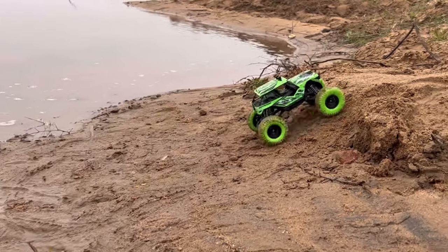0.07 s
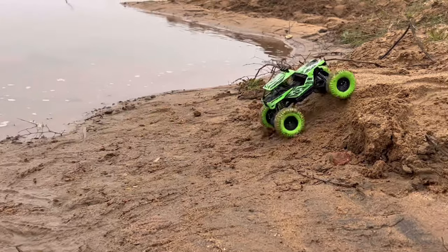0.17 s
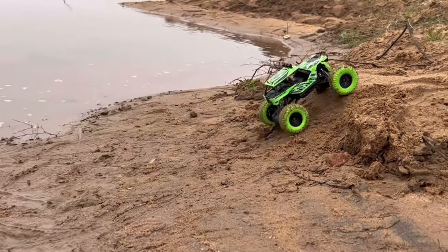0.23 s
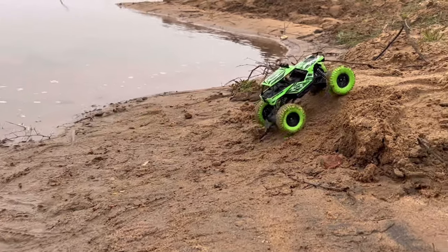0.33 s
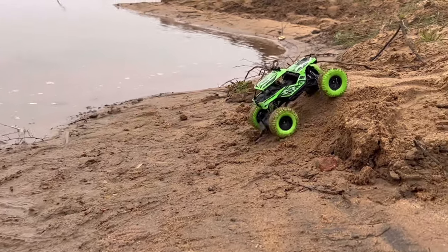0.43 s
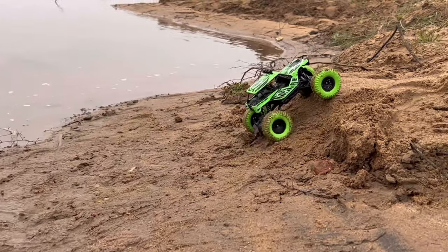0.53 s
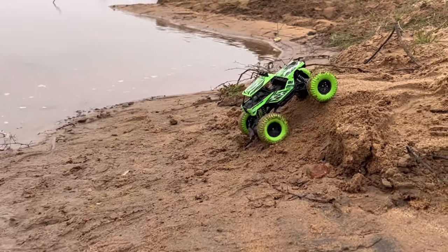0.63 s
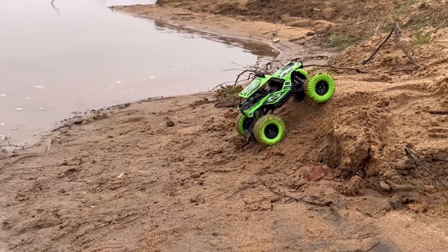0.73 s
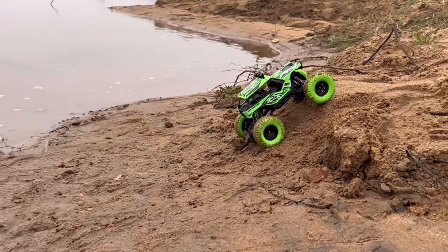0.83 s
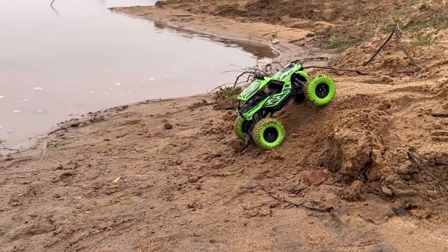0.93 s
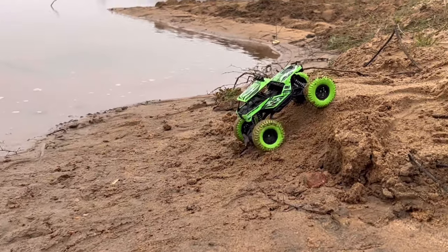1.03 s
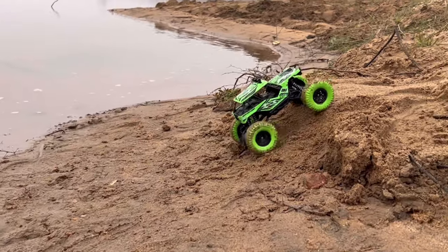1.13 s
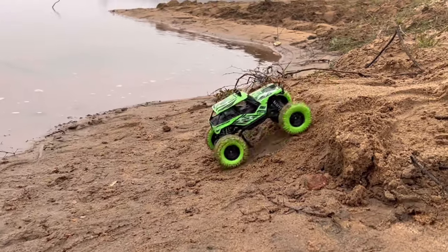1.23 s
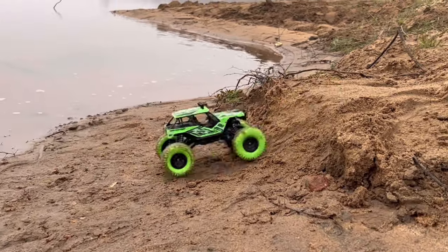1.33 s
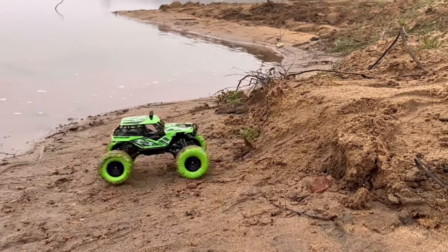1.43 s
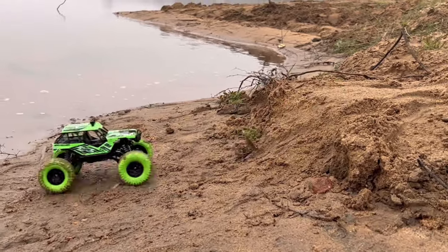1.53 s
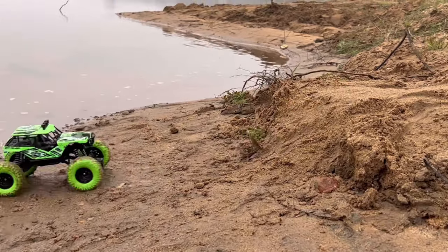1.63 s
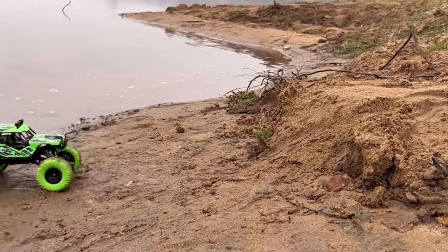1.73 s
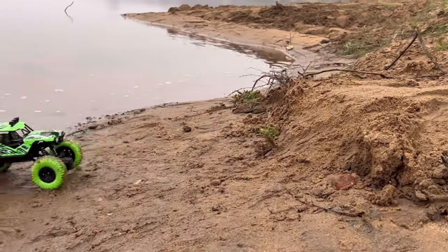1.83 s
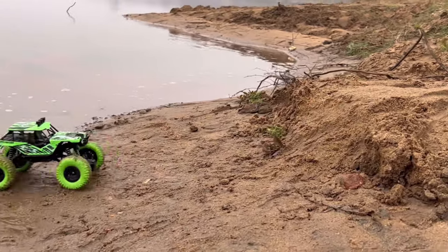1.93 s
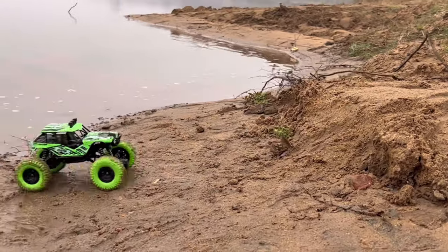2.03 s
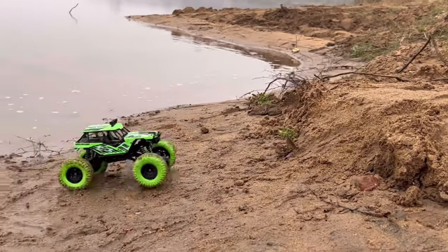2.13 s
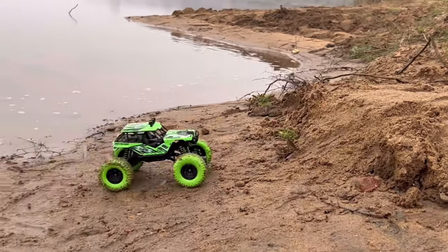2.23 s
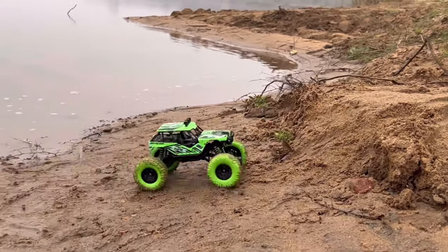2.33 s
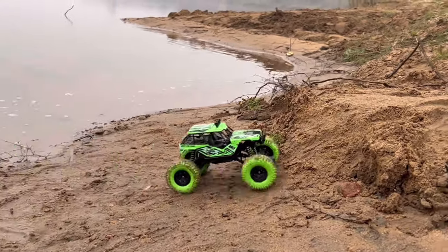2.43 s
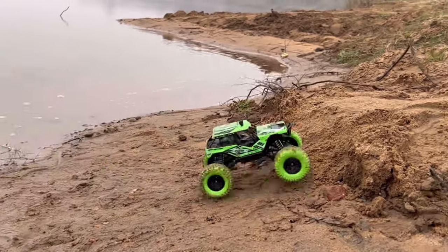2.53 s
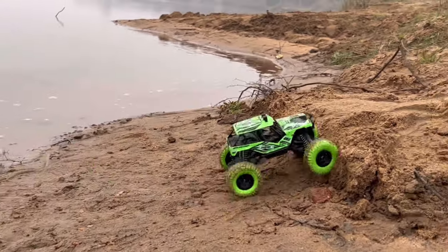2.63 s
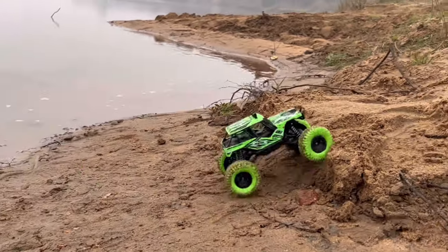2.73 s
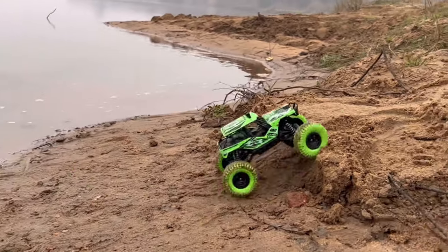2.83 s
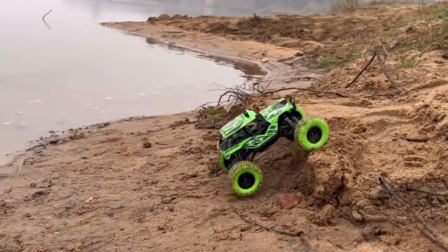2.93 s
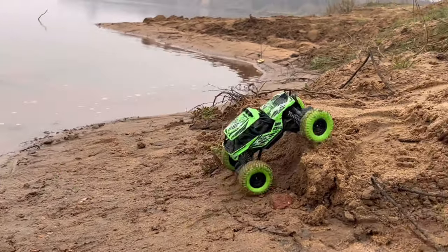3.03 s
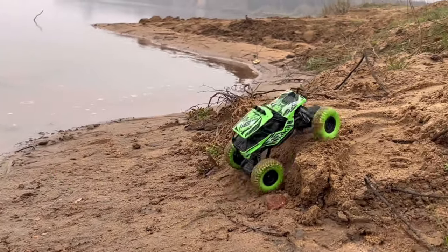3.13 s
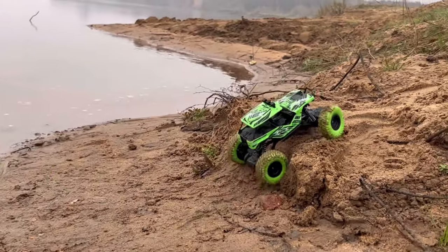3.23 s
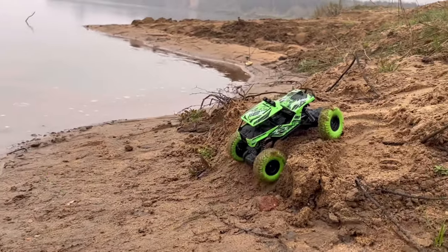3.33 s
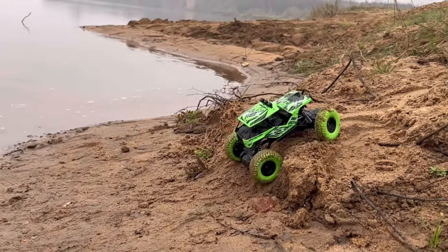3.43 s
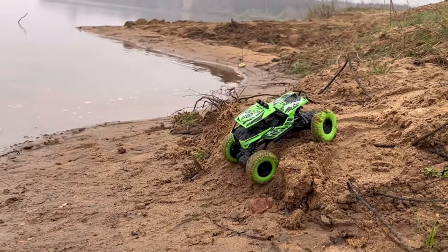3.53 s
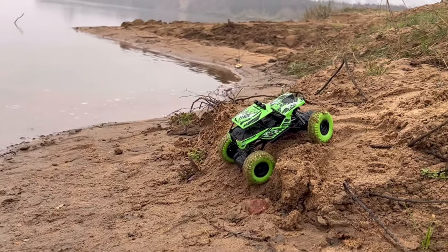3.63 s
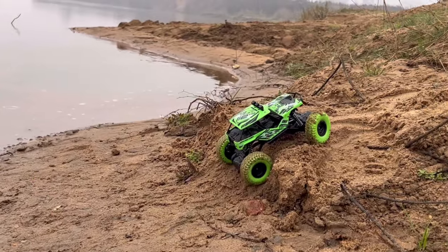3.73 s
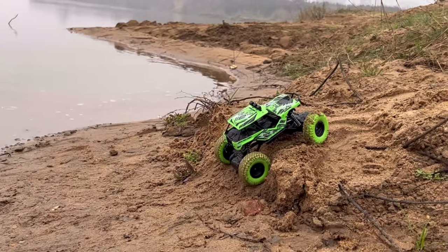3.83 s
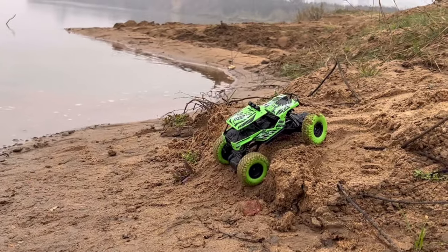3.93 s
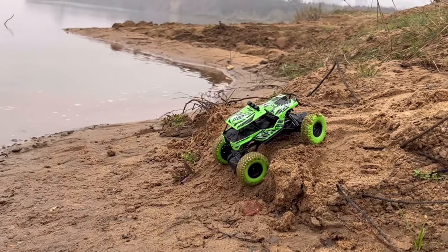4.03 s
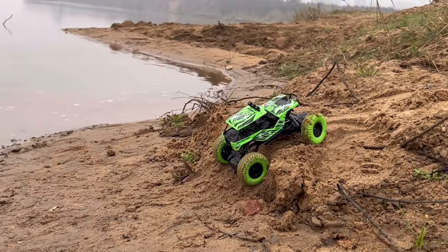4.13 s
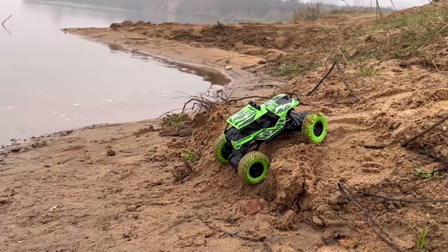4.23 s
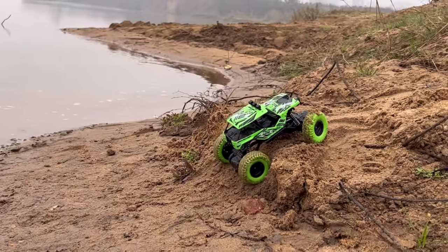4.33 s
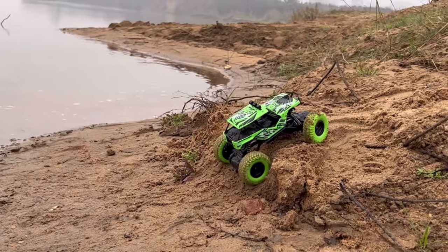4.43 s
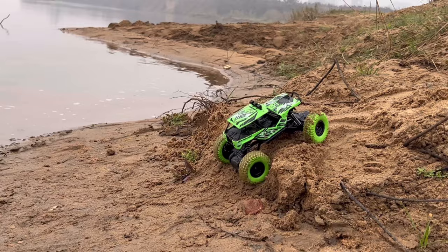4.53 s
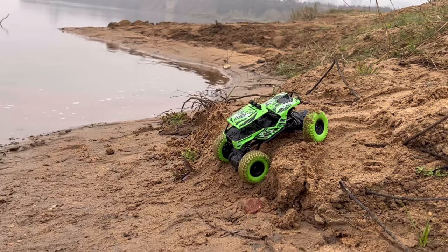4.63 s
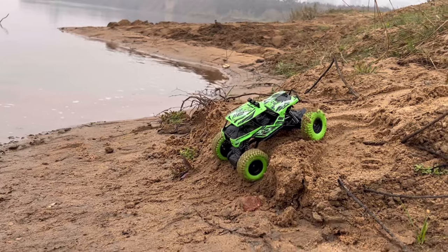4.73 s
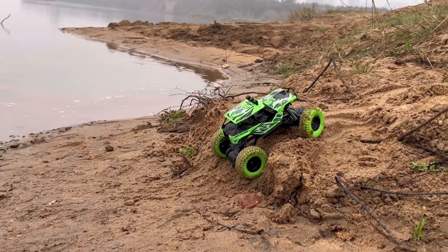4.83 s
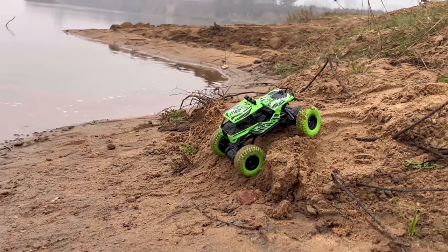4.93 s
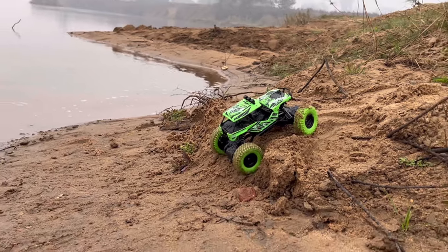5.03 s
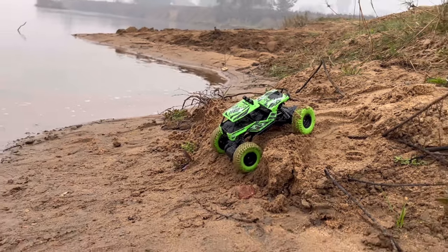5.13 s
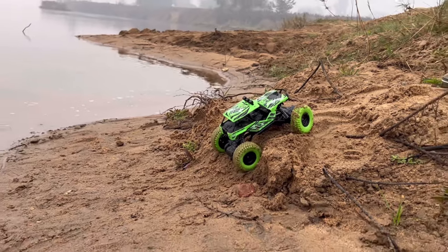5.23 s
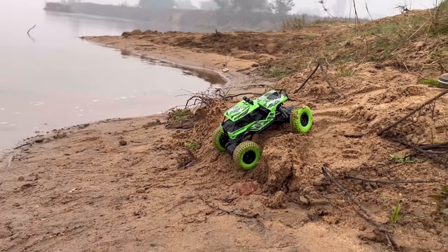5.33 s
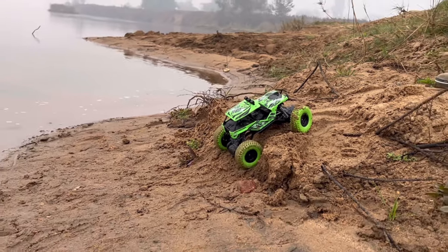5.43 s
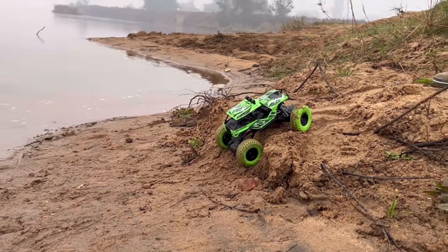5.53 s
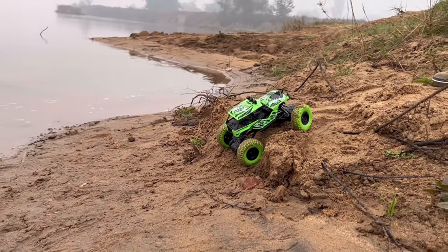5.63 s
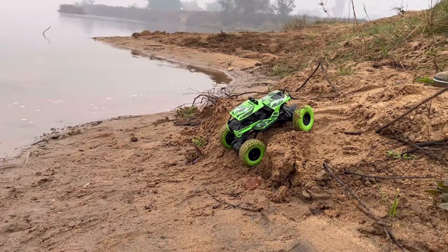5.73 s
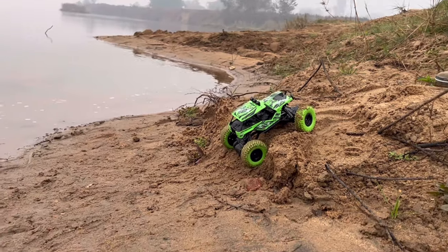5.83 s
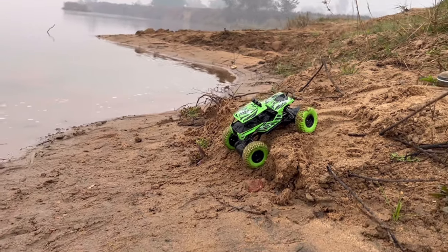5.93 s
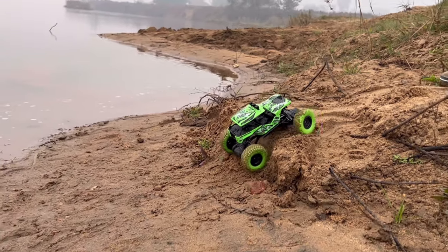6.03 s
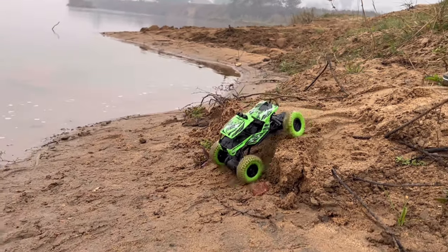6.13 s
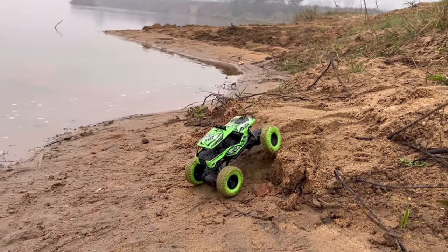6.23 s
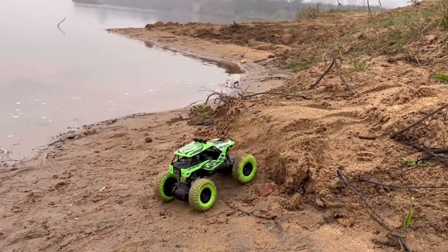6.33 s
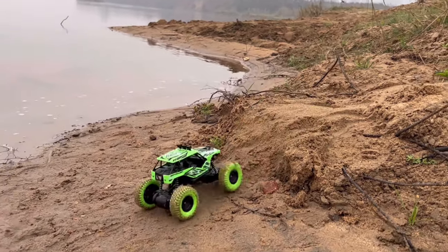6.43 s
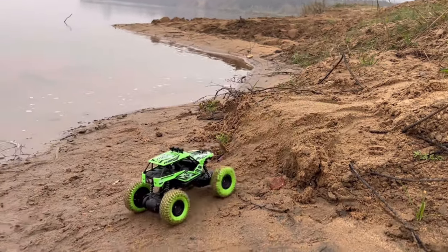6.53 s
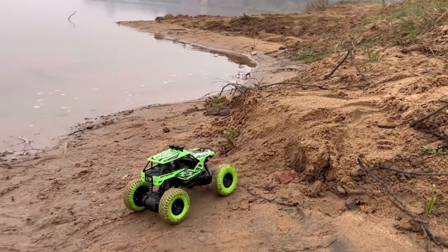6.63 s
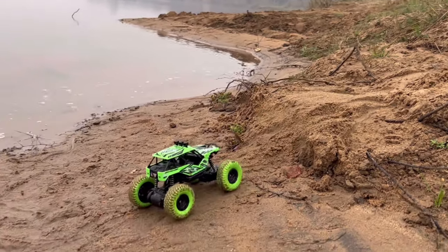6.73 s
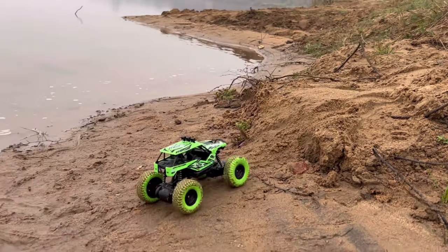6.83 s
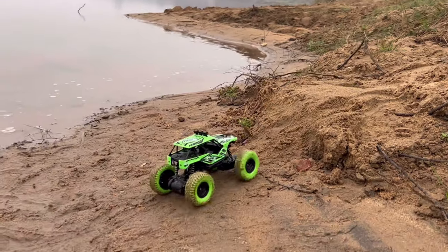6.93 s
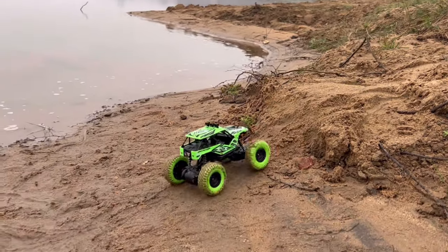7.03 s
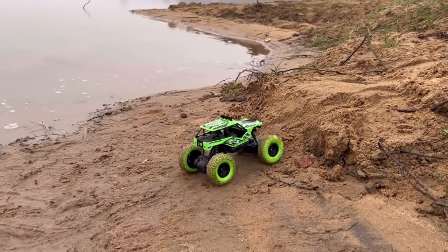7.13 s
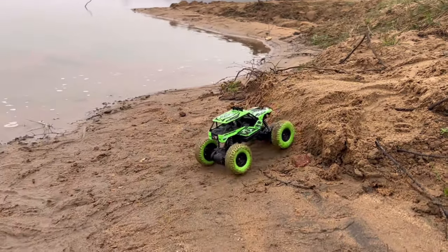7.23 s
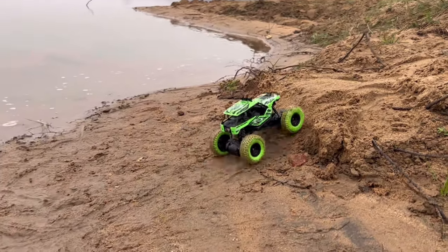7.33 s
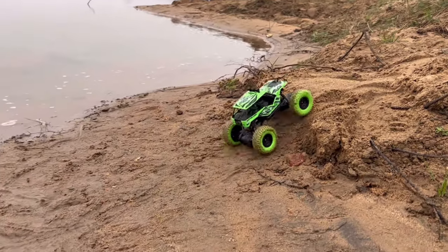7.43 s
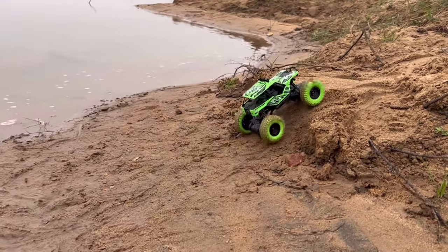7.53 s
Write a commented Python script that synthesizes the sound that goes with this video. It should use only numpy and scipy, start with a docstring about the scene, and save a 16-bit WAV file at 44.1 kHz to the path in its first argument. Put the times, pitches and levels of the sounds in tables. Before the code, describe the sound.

A toy truck's little electric motor and plastic gearbox whine harshly close by, outdoors. It strains and sags, stops, races higher while clattering downhill, then pulls again and bogs into a long, rapid stutter as wheels hop in sand. A short reversing burst coasts down, a pause, then another spurt. Tyres scuff, sand hisses and loose parts knock over very faint air; dry, close stereo pickup.

```python
"""Toy truck on a sandy bank

A toy truck climbs a sandy bank outdoors in spurts of throttle. Its gears whine at the tooth-mesh rate and its
overtones, and rattle through a resonant plastic shell; load sets the pitch. Stuck on the slope, the wheels hop:
they spin up, bite and are braked, some 20 to 30 times a second. Brushes and flung sand hiss, tyres scuff and slap,
and loose parts knock. Rough ground and the bank return diffuse sound, over faint air and two soft gusts."""
import sys
import numpy as np
from scipy import signal
from scipy.fft import rfft, irfft
from scipy.io import wavfile
from scipy.ndimage import uniform_filter1d

SR = 44100
rng = np.random.default_rng(int(sys.argv[2]) if len(sys.argv) > 2 else 0)


def generate_wav(signal):
    """Clip the signal to [-1, 1] and save it as 16-bit WAV at the path in sys.argv[1]."""
    frames = np.transpose(np.atleast_2d(signal))
    scaled = np.clip(frames, -1, 1) * 32767
    pcm = np.round(scaled).astype(np.int16)
    wavfile.write(sys.argv[1], SR, pcm)


N = 334278
T = np.arange(N) / SR

# response of the level truck's shell, heard through its flank: frequency_hz, gain_db
FLANK = [(350, -28.5), (700, -16), (1050, 4), (1350, 1.5), (1680, -6.5), (1950, 0), (2200, -2.5),
         (2480, 4.5), (2900, 1), (3300, -8), (3700, -5), (4300, -9), (4720, -6.5), (5200, -6), (6500, -8),
         (8000, -13), (11000, -11.5), (16000, -26.5)]


def undb(db):
    """Amplitude ratio of a level: 20 dB for each factor of ten."""
    return 10 ** (np.asarray(db) / 20)


def unit(x):
    """Normalise to an rms of 1, so that a later gain sets the level."""
    return x / np.sqrt(np.mean(x ** 2))


def curves(table):
    """Linear interpolation in time of each column of a table."""
    s, *columns = np.transpose(table)
    return [np.interp(T, s, c) for c in columns]


def by_rate(hz, table):
    """Linear interpolation of each column of a table at the given mesh rate."""
    rates, *columns = np.transpose(table)
    return [np.interp(hz, rates, c) for c in columns]


def response(points, hz):
    """Gain of a (frequency_hz, gain_db) spectrum, interpolated in log frequency."""
    f, db = np.transpose(points)
    return undb(np.interp(np.log(np.maximum(hz, 1)), np.log(f), db))


def colour(x, points, size=2048):
    """Minimum-phase filter from the folded cepstrum: causal, so clicks ring only after they strike."""
    cepstrum = irfft(np.log(response(points, np.fft.rfftfreq(size, 1 / SR))))
    cepstrum[1:size // 2] *= 2
    cepstrum[size // 2 + 1:] = 0
    impulse = irfft(np.exp(rfft(cepstrum)))
    return signal.fftconvolve(x, impulse)[:N]


def wander(hz):
    """Band-limited Gaussian fluctuation of spread 1, strongest at the given frequency."""
    f = np.fft.rfftfreq(N, 1 / SR)
    band = f / hz * np.exp(-(f / hz) ** 2 / 2)
    return unit(irfft(rfft(rng.standard_normal(N)) * band, N))


def grains(rate, spread_db):
    """Shot noise: random clicks per second of uneven size, rms 1."""
    hit = rng.random(N) < rate / SR
    return unit(hit * rng.standard_normal(N) * undb(spread_db * np.minimum(rng.exponential(size=N), 4)))


def motor():
    """Torque balance: each spurt kicks off from rest, follows the load and rolls to a stop."""
    # mesh rate under throttle, one list per stretch: time_s, mesh_rate_hz
    stretches = [
        [(0.0, 1334), (0.02, 1475), (0.046, 1243), (0.064, 1466), (0.084, 1279), (0.11, 1562), (0.132, 1513),
         (0.168, 1240), (0.238, 1556), (0.278, 1493), (0.3, 1602), (0.37, 1421), (0.43, 1327), (0.47, 1169),
         (0.55, 947), (0.6, 1046), (0.636, 986), (0.69, 1099), (0.74, 997), (0.812, 953), (0.92, 1082)],
        [(1.09, 974), (1.12, 1194), (1.145, 1521), (1.215, 1888), (1.26, 1873), (1.305, 2423), (1.33, 2171),
         (1.405, 2540), (1.428, 2195), (1.45, 2524), (1.48, 2480)],
        [(1.87, 718), (1.906, 943), (2.0, 1160), (2.09, 1422), (2.17, 1530), (2.2, 1402), (2.29, 1695),
         (2.345, 1698), (2.367, 1499), (2.395, 1798), (2.51, 1783), (2.535, 1630), (2.55, 1728), (2.565, 1566),
         (2.595, 1608), (2.67, 1892)],
        [(2.69, 1262), (2.73, 1162), (2.76, 1023), (2.84, 836), (2.942, 767), (3.11, 925), (3.142, 770),
         (3.195, 899.9), (3.25, 1236), (3.296, 1102), (3.34, 1096), (3.6, 971), (3.706, 975.7), (3.95, 1054),
         (4.6, 1107), (5.6, 1092)],
        [(5.92, 843), (5.952, 981), (5.962, 1112), (6.008, 1400), (6.05, 1535), (6.12, 1657), (6.158, 1565),
         (6.19, 1795), (6.31, 1881)],
        [(6.84, 748), (6.882, 959), (6.94, 1093), (6.97, 1274), (7.0, 1252), (7.02, 1400), (7.065, 1428),
         (7.08, 1322), (7.11, 1467), (7.135, 1299), (7.17, 1508), (7.29, 1497), (7.335, 1318), (7.355, 1444),
         (7.38, 1288), (7.44, 1454), (7.49, 1182), (7.51, 1246), (7.58, 1257)],
    ]
    # start_s, stop_s, roll_out_s, whine_trim_db, rattle_trim_db, hiss_trim_db
    spurts = [(-.1, 0.926, 0.026, -1, 1.2, -1.5), (1.068, 1.495, 0.24, -6.5, 0.5, -4.5),
              (1.728, 5.636, .035, -1, 0.5, -1), (5.903, 6.322, 0.45, -3.5, -2, -4.5),
              (6.796, 7.699, 0.08, -3, 4, 0)]
    kick_hz, kick_s = 281, .004  # mesh rate reached just after switching on
    throttle_s = 0.045  # time for the load to come and go
    points = [p for stretch in stretches for p in stretch]
    throttle, trims = np.zeros(N), np.zeros((3, N))
    for on, off, roll_s, *trim_db in spurts:
        last_hz = max(p for p in points if p[0] < off)[1]
        points += [(on, 0), (on + kick_s, kick_hz), (off, last_hz), (off + roll_s, 0)]
        throttle[(T >= on) & (T < off)] = 1
        trims[:, T >= on] = np.array(trim_db)[:, None]
    hz, = curves(sorted(points))
    throttle = uniform_filter1d(throttle, int(throttle_s * SR))
    return np.maximum(hz, 1), throttle, trims


def gear_levels(hz, throttle, trims, depth):
    """Radiated level follows tooth speed and load: whine, rattle, hiss and overtones (relative dB)."""
    # mesh_rate_hz, then relative levels whine_db, rattle_db, hiss_db, overtones_to_rattle_db
    by_speed = [(0, -100, -59, -77, -17), (90, -90, -60, -53, -24), (298.7, -94, -47.5, -52.5, 20),
                (761.9, -56, -38, -55, 1.5), (913, -44, -34.5, -51, 8), (1020, -36.5, -33.5, -48.5, 6),
                (1290, -41.5, -31.5, -44, 12.5), (1550, -39, -30.5, -39, 11), (1690, -41, -28, -40, 14.5),
                (2391, -32, -29.5, -62, 14)]
    # changes off the throttle
    slack_gears_db, slack_hiss_db, slack_overtones_db = -11.5, -6.5, -35
    # falls with the wheels in the air: the whine tends to a limit, half of it at half_swing
    airborne_whine_db, half_swing = -30, 0.24
    airborne_gears_db = -15.5  # per unit of swing
    whine_db, rattle_db, hiss_db, clean_db = by_rate(hz, by_speed)
    whine_trim, rattle_trim, hiss_trim = trims
    slack = 1 - throttle
    whine_fall = airborne_whine_db * depth / (depth + half_swing)
    gear_fall = airborne_gears_db * depth
    return (whine_db + whine_trim + slack_gears_db * slack + whine_fall,
            rattle_db + rattle_trim + slack_gears_db * slack + gear_fall,
            hiss_db + hiss_trim + slack_hiss_db * slack + gear_fall,
            clean_db + slack_overtones_db * slack)


def gear_whine(hz):
    """Periodic tooth contact: mesh tone, overtones and rattle, modulated once a turn by pinion and gear."""
    # force at 2, 3, 4 .. times the mesh rate: level_db
    tooth_force = [18.2, 22.4, 24.9, 23.6, 22.8, 21.8, 11, 3.3]
    # shift of the lowest overtones with load: time_s, second_db, third_db, fourth_db
    low_overtones = [(0, 5, 4, -4.5), (.45, 6, 3.5, 3), (.6, 9, -6, 3), (1.15, 1, -4, -4),
                     (1.4, 3.5, 4.5, 1.5), (1.9, 9.5, -1, 2), (2.08, 8.5, 7, -1.5), (2.25, 9, -1.5, 4),
                     (2.5, 4, 0, -3), (2.58, 5, 11.5, 1.5), (2.7, 2, 0.5, -1), (3.3, 2, 5.5, 2.5),
                     (3.6, 8, 0, 1), (5.6, -5, -0.5, -5.5), (5.95, 1.5, -5, -1), (6.06, 0, 9.5, 0),
                     (6.13, 6, 5, 0), (6.2, 1, -2, -3), (6.9, -2.5, -2.5, 1), (7.05, -0.5, 0.5, -6.5),
                     (7.24, 0.5, -1.5, -1), (7.4, 1, -1, -7), (7.58, -2.5, 2, -8)]
    # play in the teeth: mesh_rate_hz, pinion_sway_rad, phase_scatter_rad
    play = [(700, .42, .03), (870, .38, .03), (1020, .1, .02), (1250, .1, .04), (1450, .13, .09),
            (1600, .1, .08), (1800, .15, .24), (2300, .2, .6)]
    gear_teeth, pinion_teeth = 37, 12
    gear_sway = .014  # share of speed
    gear_throb_db = 1.35  # at a mesh rate of 1 kHz
    tooth_jitter_rad = .17  # phase waver of each overtone, before the play adds to it

    # an off-centre reduction gear binds once a turn
    gear = np.sin(2 * np.pi * np.cumsum(hz * (1 + .1 * wander(20))) / SR / gear_teeth)
    phase = 2 * np.pi * np.cumsum(hz * (1 + gear_sway * gear)) / SR
    shaft = phase / pinion_teeth
    # the pinion shudders near the stall; the teeth skip at top speed
    sway_rad, scatter_rad = by_rate(hz, play)
    phase = phase + scatter_rad * wander(227) + sway_rad * np.sin(shaft)
    tone = np.sin(phase) * undb(1.6 * np.sin(shaft) + 1.6 * wander(55))

    overtones, lift_db = 0, dict(enumerate(curves(low_overtones), 2))
    for k, db in enumerate(tooth_force, 2):
        turn_db = 2.4 * np.sin(shaft + rng.uniform(0, 2 * np.pi))
        throb = undb(db + lift_db.get(k, 0) + turn_db + 1.8 * wander(32))
        audible = k * hz < SR / 2  # no aliasing
        jitter = (tooth_jitter_rad + 2 * scatter_rad) * wander(138)
        overtones = overtones + throb * audible * np.sin(k * phase + jitter)

    # one slap of random strength per tooth, on top of dense grains
    tooth_passes = np.diff(np.floor(np.cumsum(hz) / SR), prepend=0)
    slaps = tooth_passes * rng.standard_normal(N)
    surge = undb(1.2 * np.sin(shaft) + .7 * wander(60))
    rattle = (0.37 * unit(slaps) + grains(rate=8000, spread_db=1.0)) * surge
    # the throb grows with speed squared, up to 1.8 kHz
    bind = undb(gear_throb_db * np.minimum(hz / 1000, 1.8) ** 2 * gear)
    return unit(tone), overtones * bind, rattle * np.sqrt(bind)


def through_shell(force, nose_up, ring_db, ring_t60=0.058):
    """Modal density: many quickly dying plastic modes make gliding partials flicker; pose sets the colour."""
    # response with the nose up and the gearboxes in view: frequency_hz, gain_db
    shell = [(400, -40.5), (680, -16), (980, 6.5), (1480, 4.5), (1700, -7), (2020, -.5), (2250, -5),
             (2550, 4), (2880, 3.5), (3300, -2.5), (3700, 2.5), (4300, 0.5), (4750, -3.5), (5250, -7.5),
             (5700, -2.5), (6250, -2.5), (6900, -9), (7500, -10.5), (11000, -14), (16000, -20)]
    age = T[:SR // 20]
    decay = np.exp(-np.log(1000) * age / ring_t60)
    ring = rng.standard_normal(len(age)) * decay * np.minimum(age / 0.00025, 1)
    force = force + undb(ring_db) * signal.fftconvolve(force, ring / np.linalg.norm(ring))[:N]
    return unit(nose_up * colour(force, shell) + (1 - nose_up) * colour(force, FLANK))


def radiated_whine(tone):
    """Radiation efficiency: the small shell radiates little below its first resonance."""
    return colour(tone, [(500, -37.5), (720, 2.0), (900, -5), (1060, 1.0), (1400, -7.0), (1700, -19.5),
                         (2250, -7.5), (2480, -4), (2800, -20.5)])


def brush_and_sand_hiss(hiss_db, bite_rattle):
    """Shot noise: brushes and spraying sand make many tiny impacts, stronger in a bite."""
    # frequency_hz, gain_db
    hiss = [(3000, -75), (7500, -1), (9200, -4), (10300, -13), (11800, -0.5), (13200, -1.5), (16000, -13)]
    grit = unit(colour(grains(rate=8200, spread_db=3.5), hiss))
    return grit * np.hypot(undb(hiss_db - 4.5), undb(-15.0) * bite_rattle)


def tyre_scuff(throttle, depth):
    """Granular friction: sparse sand grains yield under soft tyres, more as the wheels dig."""
    # driven, rolling free, and added per unit of swing; relative to the gears
    driven_db, rolling_db, digging_db = -30.5, -19.5, 21.5
    scuff_db = throttle * driven_db + (1 - throttle) * rolling_db + digging_db * depth
    spectrum = [(40, -13.0), (150, -9.5), (450, -9.5), (1200, -6.5), (5000, -57)]
    return undb(scuff_db) * unit(colour(grains(rate=770, spread_db=5.5), spectrum))


def hops():
    """Stick-slip: bites, shorter when harder, and single jolts; also how hard the wheels hop (log ratio)."""
    # wheels biting the sand: time_s, whine_db, rattle_db, speed_swing_log_ratio
    sand_bites = [ (.72, -26, -37, 0.069), (0.749, -25, -37, 0.14), (0.79, -28.5, -37.5, 0.11),
                  (0.82, -39, -46, 0.079), (.856, -27, -37.5, 0.12), (0.891, -26.5, -35.5, 0.1),
                  (0.919, -31, -35, 0.07), (2.688, -26, -28, 0.29), (2.732, -26.5, -31, 0.18),
                  (2.76, -25, -36.5, 0.16), (2.791, -29.5, -42.5, 0.044), (3.572, -27, -40.5, 0.085),
                  (3.609, -31.5, -56, 0.079), (3.641, -29.5, -41.5, 0.075), (3.678, -27, -42.5, 0.081),
                  (3.705, -29, -41, 0.064), (3.742, -26.5, -38.5, 0.099), (3.775, -25, -42, 0.085),
                  (3.81, -24.5, -40.5, 0.11), (3.843, -26.5, -41, 0.11), (3.878, -23.5, -39, 0.13),
                  (3.911, -28, -39.5, 0.12), (3.946, -27.5, -39.5, 0.17), (3.978, -25, -38.5, 0.23),
                  (4.012, -23.5, -35, 0.3), (4.054, -26, -36.5, 0.27), (4.093, -23, -35, 0.29),
                  (4.136, -26.5, -37, 0.31), (4.177, -19.5, -35, 0.27), (4.215, -23.5, -34, 0.29),
                  (4.247, -24.5, -38, 0.19), (4.285, -23, -37, 0.3), (4.331, -21, -33.5, 0.32),
                  (4.376, -23, -35.5, 0.29), (4.42, -22, -32.5, 0.34), (4.461, -24, -35, 0.34),
                  (4.507, -22.5, -31.5, 0.31), (4.553, -23, -34.5, 0.31), (4.595, -29.5, -32.5, 0.36),
                  (4.645, -25.5, -29, 0.4), (4.694, -18.5, -28.5, 0.37), (4.738, -20, -31.5, .35),
                  (4.781, -22, -31.5, .35), (4.825, -29, -30.5, 0.37), (4.877, -26, -31, 0.38),
                  (4.921, -29, -34, 0.22), (4.936, -37, -38.5, .12), (4.965, -23.5, -33, 0.33),
                  (5.008, -24.5, -31.5, 0.4), (5.059, -18.5, -28.5, 0.4), (5.114, -26.5, -30.5, 0.33),
                  (5.158, -27, -33, 0.28), (5.199, -22.5, -31.5, 0.33), (5.25, -24, -30, 0.34),
                  (5.299, -28, -30, 0.33), (5.35, -28, -30, 0.31), (5.392, -25.5, -31.5, 0.28),
                  (5.43, -29, -33, 0.15), (5.461, -28, -32, 0.13), (5.49, -25, -36, 0.15),
                  (5.531, -21.5, -33.5, 0.23), (5.577, -26, -32, 0.37)]
    # a wheel meeting a bump: time_s, whine_db, rattle_db
    jolts = [(0.177, -35, -38), (.454, -25.5, -52), (.487, -26.5, -49), (1.318, -26, -30),
             (1.413, -12.5, -54), (1.424, -37, -31), (1.458, -22.5, -52), (1.476, -26, -38.5),
             (2.361, -34, -31.5), (2.403, -42, -29), (2.527, -41, -29.5), (2.612, -47, -45),
             (3.036, -50, -50), (3.095, -30, -43), (3.21, -33, -58), (6.148, -41, -34.5), (6.301, -46, -35),
             (6.352, -33, -40.5), (7.118, -48, -33)]
    jolt_swing, jolt_s = .075, .0065  # log ratio, half length
    bite_s, halving_swing = .0105, .37  # half length of a gentle bite, and the swing that halves it
    hop_s = .04  # the wheels stay light this long after a bite, and half as long before
    events = [(s, whine_db, rattle_db, jolt_swing, jolt_s) for s, whine_db, rattle_db in jolts]
    depth = np.zeros(N)
    for s, whine_db, rattle_db, swing in sand_bites:
        events.append((s, whine_db, rattle_db, swing, bite_s / (1 + swing / halving_swing)))
        depth[(T > s - hop_s / 2) & (T < s + hop_s)] = swing
    return events, uniform_filter1d(depth, size=700)


def bites(events, lead_s=0.0034, brake=1.3, release=0.57, sag=.8):
    """Frictional braking: the wheel spins up and the noise swells; the tyre bites and both collapse."""
    whine, rattle, swing = np.zeros((3, N))
    for s, whine_db, rattle_db, depth, half_s in events:
        near = slice(max(int((s - .05) * SR), 0), int((s + .05) * SR))
        u = (T[near] - s) / half_s
        whine[near] += undb(whine_db) * np.exp(-np.where(u < 0, u, u / release) ** 2)
        # the rattle peaks before the whine
        rattle[near] += undb(rattle_db) * np.exp(-np.square((u + lead_s / half_s) / 1.58))
        # speed rises before the bite and sags after it
        pulse = u / brake * np.exp((1 - (u / brake) ** 2) / 2)
        swing[near] -= depth * np.where(u < 0, 1, sag) * pulse
    return whine, rattle, swing


def tyre_slap(depth, bite_rattle):
    """Cavity resonance: hard hops slap the hollow tyres on the ground."""
    spectrum = [(350, -26.5), (600, -12.0), (780, 7.5), (1100, 3.0), (2000, -42.5)]
    thud = unit(colour(rng.standard_normal(N), spectrum))
    return undb(-1.0) * depth * bite_rattle * thud


def drivetrain():
    """Source and load: speed sets the pitch; effort and bites set the strength of whine, rattle and hiss."""
    # pose and load on the teeth: time_s, nose_up_share, overtone_change_db
    pose = [(0, 0.45, -8), (.45, 0.8, -8), (.9, 0.42, 2.5), (1.1, 0.24, -5), (1.24, 0.01, -7.5),
            (1.29, 0.09, -9), (1.42, 0.04, -6), (1.85, 0.05, -13), (2.07, 0.24, -11), (2.3, 0.12, -8.5),
            (2.5, 0.01, -7), (2.58, 0.14, -10.5), (2.8, 0.9, -4.5), (3.3, 0.84, -5), (4, 1, -5),
            (5.5, 0.6, -5), (5.93, 0.86, -15), (6.04, 0.82, -6), (6.13, 0.24, -10), (6.17, 0.05, -10),
            (6.21, 0.45, -12.5), (6.24, 0.22, -10), (6.8, 0.57, -8), (7.0, 1, -2.5), (7.58, 0.96, -9.5)]
    # share of speed: least at the best pulling speed, more per octave away and per unit of swing
    steady_share, per_octave, per_swing, pulling_hz = .013, .017, .03, 1064
    airborne_overtones_db = -18  # per unit of swing
    slack_burst_db = 2.2

    hz, throttle, trims = motor()
    events, depth = hops()
    whine_db, rattle_db, hiss_db, clean_db = gear_levels(hz, throttle, trims, depth)
    octaves = np.minimum(np.abs(np.log2(hz / pulling_hz)), .5)
    unsteady = steady_share + per_octave * octaves + per_swing * depth
    nose_up, load_db = curves(pose)
    nose_up = np.clip(nose_up, 0, 1)

    bite_whine, bite_rattle, swing = bites(events)
    tone, overtones, rattle = gear_whine(hz * np.exp(swing + unsteady * wander(22)))
    # the other axle has its own gearbox, never quite in step
    other_hz = hz * np.exp(.5 * swing + .04 * wander(3.8) + unsteady * wander(28.3))
    _, other_axle, _ = gear_whine(other_hz)
    overtones = through_shell(overtones + undb(-13) * other_axle, nose_up, ring_db=-10)

    # driven gears rasp evenly; unloaded ones run slack and clatter in bursts
    airborne = depth * (1 - bite_rattle / np.hypot(bite_rattle, undb(rattle_db)))
    clean = undb(clean_db + load_db + airborne_overtones_db * airborne)
    rattle = rattle * undb(slack_burst_db * (1 - throttle) * wander(39))
    rattle = through_shell(rattle, nose_up, ring_db=-13)
    # the power of the gears is shared between clean overtones and rattle
    gears = (clean * overtones + rattle) / np.hypot(1, clean)
    effort = np.hypot(undb(rattle_db - 5.5), undb(1.1) * bite_rattle)

    # the mesh tone fades with slack
    steady_whine = undb(whine_db + 6.0) * clean / np.hypot(.45, clean)
    whine = radiated_whine(tone * np.hypot(steady_whine, undb(-1.5) * bite_whine))
    slap = tyre_slap(depth, bite_rattle)
    hiss = brush_and_sand_hiss(hiss_db, bite_rattle)
    return whine + slap + effort * (gears + tyre_scuff(throttle, depth)) + hiss


def outdoors():
    """Turbulence: faint air and a few soft gusts on the microphones, partly coherent between channels."""
    # still outdoor air: frequency_hz, gain_db
    still_air = [(20, 4), (40, -10), (54, -3), (75, -10.5), (130, -3.5), (300, -7.5), (700, -11.5),
                 (1300, -8), (2000, -4.5), (4000, -24.5), (8000, -27), (16000, -52.5)]
    # peak_s, level_db
    gusts = [(5.32, -60.5), (7.04, -55.5)]
    rise_s, fall_s, breeze_db = 0.037, 0.13, -72.5
    wind_spectrum = [(20, -19.0), (55, 12.5), (140, -2.5), (300, -19.0), (1500, -57)]
    gust = undb(breeze_db)
    for s, db in gusts:
        gust = gust + undb(db) * np.exp(-np.maximum((s - T) / rise_s, (T - s) / fall_s))
    shared = rng.standard_normal((2, N))
    channels = []
    for own in rng.standard_normal((2, 2, N)):
        air = unit(colour(shared[0] + 0.78 * own[0], still_air)) * undb(-66.5 + 2 * wander(11.4))
        wind = unit(colour(shared[1] + 0.16 * own[1], wind_spectrum))
        channels.append(air + wind * gust)
    return np.array(channels)


def scatter(x, t60, rise_s):
    """Diffuse reflection: decaying noise tails, uncorrelated between the two channels."""
    age = T[:SR // 2]
    envelope = np.exp(-np.log(1000) * age / t60) * np.minimum(age / rise_s, 1)
    tails = rng.standard_normal((2, len(age))) * envelope
    return np.array([signal.fftconvolve(x, h / np.linalg.norm(h))[:N] for h in tails])


def chassis():
    """Impact excitation: one contact and a brief chatter of loose plastic parts ring the shell."""
    # chassis knocks and gear backlash: time_s, contact_level_db, chatter_t60_s
    knocks = [(1.02, -39.5, 0.03), (1.077, -42, 0.022), (1.089, -27.5, 0.032), (1.258, -26, 0.033),
              (1.312, -27, 0.033), (1.338, -25.5, 0.058), (1.375, -38, 0.02), (1.419, -25, 0.044),
              (1.475, -31, .025), (1.503, -32.5, 0.12), (1.55, -36, 0.057), (1.603, -34.5, 0.31),
              (1.63, -41, 0.11), (1.726, -44.5, 0.25), (5.638, -31, 0.045), (5.666, -49.5, 0.11),
              (5.822, -57, 0.018), (5.853, -43, 0.046), (5.908, -40.5, 0.058), (5.924, -29, 0.047),
              (6.249, -38, 0.013), (6.301, -29.5, 0.044), (6.392, -45, 0.15), (6.464, -58, .15),
              (6.593, -46.5, 0.097), (6.762, -53, 0.027)]
    contact, loose = np.zeros((2, N))
    for s, db, t60 in knocks:
        start = int(s * SR)
        contact[start] += undb(db)
        loose[start:] += undb(db) * np.exp(-np.log(1000) * T[:N - start] / max(t60, .005))
    chatter = grains(rate=9000, spread_db=0)
    return colour(contact + undb(5.5) * loose * chatter, FLANK)


def scene():
    """Superposition: truck straight ahead, shifting ground scatter, the bank's faint echo and open air."""
    # scatter from rough ground relative to the direct sound: frequency_hz, gain_db
    ground = [(700, -23), (2000, -19), (4000, -16), (8000, -12), (13000, -13)]
    shift_hz = 0.895  # the pattern changes as the truck moves
    truck = drivetrain() + chassis()
    one, other = (scatter(colour(truck, ground), t60=0.013, rise_s=0.0028) for _ in range(2))
    shift = 2 * np.pi * shift_hz * T
    bank = undb(-28) * scatter(truck, t60=.28, rise_s=.008)
    return truck + np.cos(shift) * one + np.sin(shift) * other + bank + outdoors()


def record(dry):
    """Interchannel differences: level and phase part with frequency; lowest bass and top treble are cut."""
    # level between the channels: frequency_hz, left_minus_right_db
    lean = [(500, 0), (1050, 0), (1600, -4), (2000, -3), (2500, 0), (3800, 0), (5500, 0.5), (7000, -0.5)]
    # phase between the channels: frequency_hz, left_lead_rad
    ports = [(0, 0), (1100, -.3), (1600, -.55), (2200, .1), (2800, .3), (3800, .45), (4900, 0), (5700, -.8),
             (6400, 0), (7400, 0), (7700, -.8), (9000, -2.2), (9900, -3.14), (11600, -4.7), (12200, -6.28),
             (13600, -6.28), (14000, -7.2), (15600, -9.4)]
    hz = np.fft.rfftfreq(N, 1 / SR)
    # each channel takes half of the difference
    left = np.sqrt(response(lean, hz)) * np.exp(1j * np.interp(hz, *np.transpose(ports)) / 2)
    heard = irfft(rfft(dry) * np.array([left, 1 / left]), N)
    heard = signal.sosfilt(signal.butter(3, 36, "high", fs=SR, output="sos"), heard)
    return signal.sosfilt(signal.ellip(10, .2, 80, 15700, fs=SR, output="sos"), heard)


dry = scene()
out = record(dry)
generate_wav(out)
```